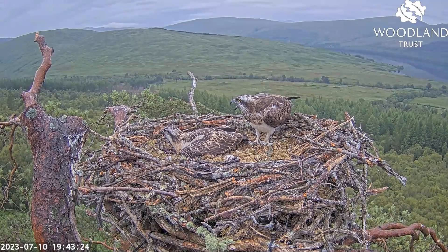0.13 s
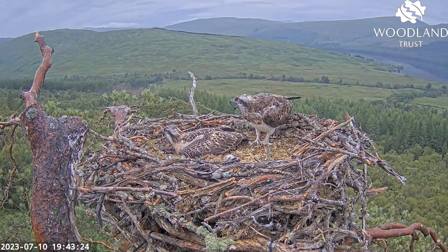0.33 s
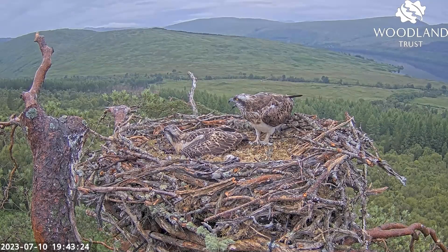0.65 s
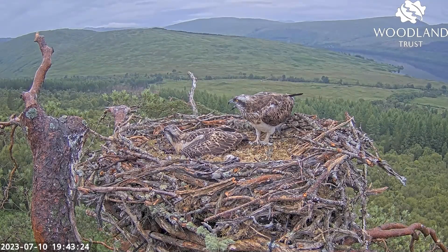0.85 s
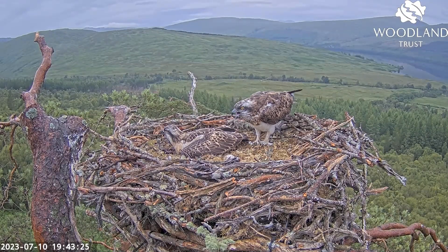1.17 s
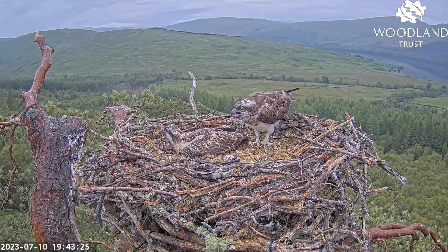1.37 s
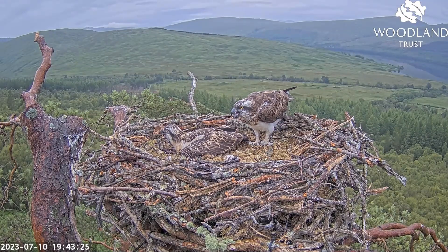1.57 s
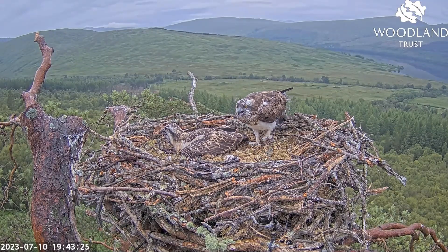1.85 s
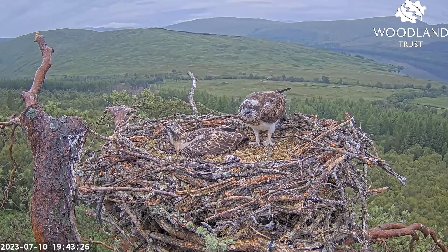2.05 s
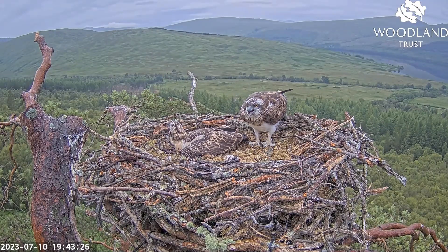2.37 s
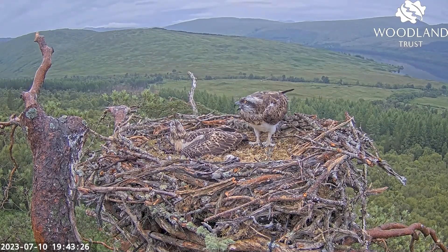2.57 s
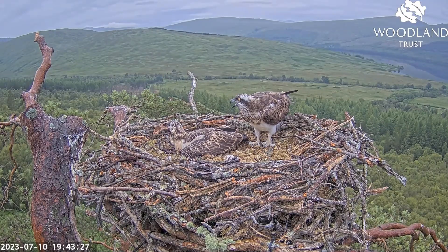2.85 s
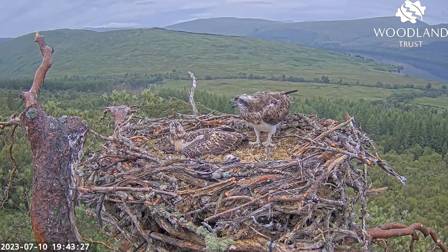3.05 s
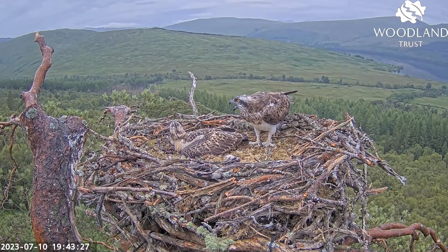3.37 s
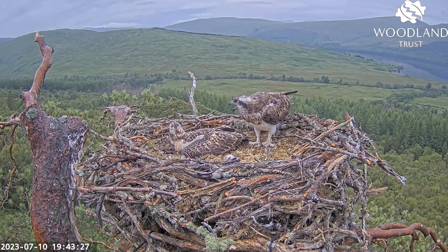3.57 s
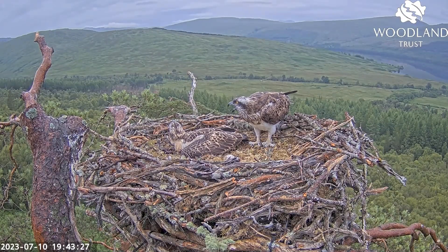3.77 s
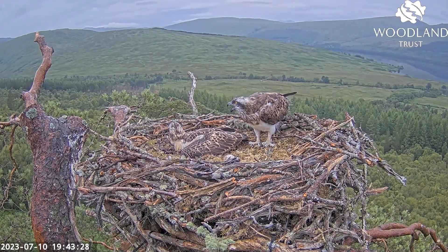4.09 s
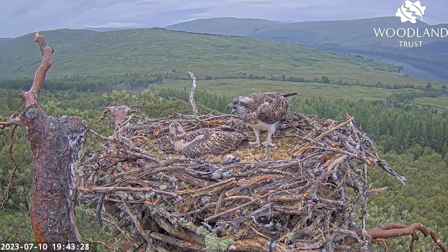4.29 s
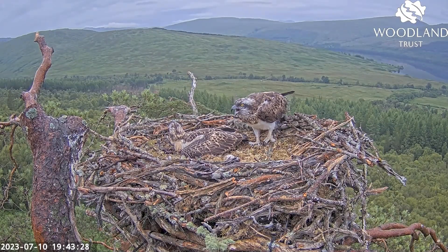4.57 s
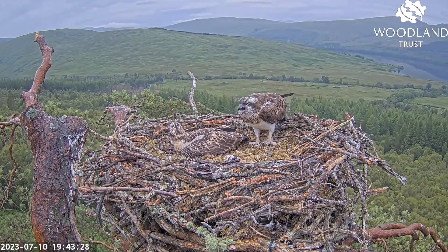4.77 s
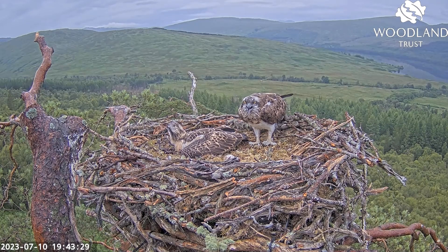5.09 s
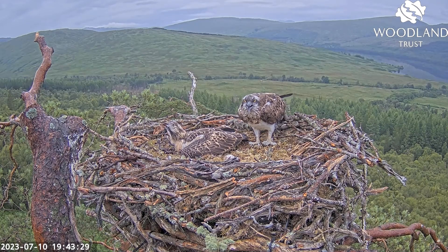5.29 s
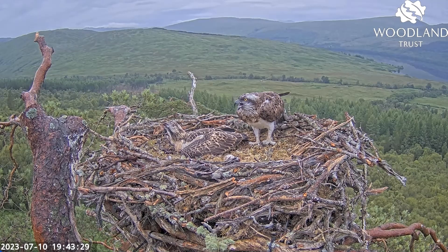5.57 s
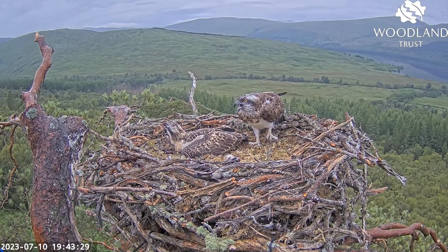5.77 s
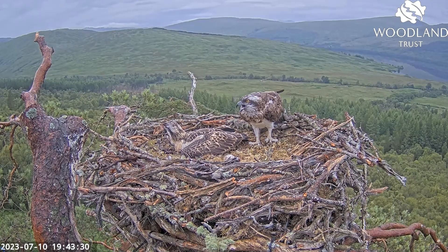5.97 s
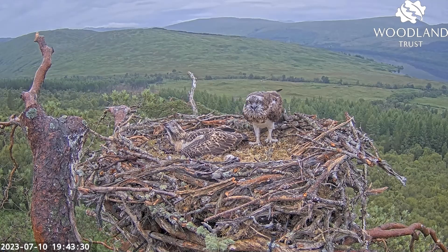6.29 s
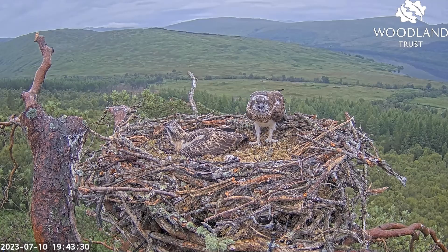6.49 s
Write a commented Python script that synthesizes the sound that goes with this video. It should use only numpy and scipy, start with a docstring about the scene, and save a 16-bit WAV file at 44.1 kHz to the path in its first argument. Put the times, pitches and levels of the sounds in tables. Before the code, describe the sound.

Outdoors at a treetop nest, a large raptor calls close to the microphone from the first moment. Its chirps come evenly, about five per second, each roughly a tenth of a second long with only a tiny gap. A faint hoarse breath leads into a clear rising note near 2.8 to 3 kHz, which cracks up into a thin whistle around 3.6 kHz. From 0 to 1.3 seconds they are fairly clean; from about 1.5 to 2.9 they become higher, brighter and raspier, many ending with a quick falling note. From 3 to 4.3 seconds they are thinner and purer, then from 4.4 they climb again, most strident and harsh around 5 to 5.5, staying rough until the sound cuts off mid-chirp near 6.6. Quiet, steady air and a faint, dull tree echo lie underneath; the top end is slightly dulled.

```python
"""Raptor chirps at a treetop nest

A large raptor gives a fast, even run of hoarse chirps, close by, over quiet air and a faint echo from trees.
Each chirp has a faint hoarse lead-in and a clear rising note made of gliding sines with short-lived overtones.
It breaks upward into a thin whistle and its octave, over a rasp of noise-smeared lines and resonant breath.
Often a falling gliding note closes it. Air is coloured noise; echoes are decaying noise convolved with the bird."""
import sys
import numpy as np
from scipy import signal
from scipy.fft import rfft, irfft
from scipy.io import wavfile

SR = 44100
rng = np.random.default_rng(int(sys.argv[2]) if len(sys.argv) > 2 else 0)


def generate_wav(signal):
    """Clip the signal to [-1, 1] and save it as 16-bit WAV at the path in sys.argv[1]."""
    frames = np.transpose(np.atleast_2d(signal))
    scaled = np.clip(frames, -1, 1) * 32767
    pcm = np.round(scaled).astype(np.int16)
    wavfile.write(sys.argv[1], SR, pcm)


def magnitude_from_level(level_db):
    """Linear magnitude for a level in decibels (20 dB per decade)."""
    exponent = np.asarray(level_db, float) / 20
    return 10 ** exponent


N = 292824


def rms_one(x):
    """Scale to rms 1."""
    return x / np.sqrt(np.mean(np.abs(x) ** 2) + 1e-20)


def drift(rate_hz):
    """Noise through a double one-pole low-pass, rms 1: slow irregular movement."""
    r = np.exp(-2 * np.pi * rate_hz / SR)
    return rms_one(signal.lfilter([1], [1, -2 * r, r * r], rng.standard_normal(N)))


def span(start_s, length_s):
    """Sample indices of a note and the time in seconds since its start."""
    first = max(round(start_s * SR), 0)
    stop = min(round((start_s + length_s) * SR), N)
    index = np.arange(first, stop)
    return index, index / SR - start_s


def fade(t, length_s, attack_s, release_s):
    """Sine-squared rise and fall of a note."""
    ramp = np.minimum(t / attack_s, (length_s - t) / release_s)
    return np.sin(np.pi / 2 * np.clip(ramp, 0, 1)) ** 2


def swelling(t, length_s, mean_db, swell_db):
    """Gain that moves by swell_db through the middle of a note."""
    return magnitude_from_level(mean_db + swell_db * np.interp(t / length_s, [.3, .7], [-.5, .5]))


# Spectrum of the air. Each row: frequency in Hz, relative density in dB per Hz.
AIR_SPECTRUM = [(20, -33), (60, -16.5), (130, -2.5), (450, -4), (750, -3.5), (1050, 4), (1350, 0),
                (2300, 4), (3200, -5.5), (5000, -11), (10000, -19.5)]
AIR_DB = -53.5


def air():
    """Steady outdoor hush: noise shaped in the spectrum, drifting slightly in level."""
    hz, density_db = np.transpose(AIR_SPECTRUM)
    bins_hz = np.maximum(np.arange(N // 2 + 1) * SR / N, 1)
    colour = magnitude_from_level(np.interp(np.log(bins_hz), np.log(hz), density_db))
    hush = irfft(rfft(rng.standard_normal(N)) * colour, N)
    return magnitude_from_level(AIR_DB + 1.1 * drift(1.7)) * rms_one(hush)


NEAR_DB, NEAR_T60_S = 7.5, 0.028
FAR_DB, FAR_T60_S, FAR_CUT_HZ, FAR_ONSET_S = -17, 0.66, 4040, 0.02


def echoes(x):
    """Scattered returns as decaying noise: quick ones from the sticks, a long dull wash from the trees."""
    t = np.arange(SR) / SR
    near = magnitude_from_level(NEAR_DB - 60 * t / NEAR_T60_S) / np.sqrt(NEAR_T60_S * SR)
    near = near * rng.standard_normal(SR)
    far = magnitude_from_level(FAR_DB - 60 * t / FAR_T60_S) / np.sqrt(FAR_T60_S * SR)
    far = far * np.clip(t / FAR_ONSET_S, 0, 1) * rng.standard_normal(SR)
    far = signal.lfilter(*signal.butter(2, FAR_CUT_HZ, fs=SR), far)
    return signal.fftconvolve(x, near + far)[:N]


# Hoarse lead-ins, one before each opening note. Each row: start in seconds, peak level before flutter in dB.
LEAD_INS = [(0.0, -37), (0.172, -42.5), (0.356, -40), (0.556, -41.5), (0.748, -35), (0.938, -40),
            (1.131, -39), (1.324, -32.5), (1.519, -41.5), (1.708, -42), (1.915, -41.5), (2.118, -32),
            (2.32, -35), (2.535, -38), (2.752, -49), (2.965, -63), (3.16, -46), (3.351, -42.5),
            (3.553, -38), (3.754, -43), (3.957, -42.5), (4.155, -37), (4.355, -37.5), (4.552, -28),
            (4.756, -33), (4.964, -28.5), (5.17, -33), (5.373, -42), (5.587, -42.5), (5.804, -38),
            (5.991, -41), (6.205, -30), (6.395, -37), (6.616, -33)]


def lead_in():
    """A faint rise before each chirp, as the air starts to flow: a gliding sine, hoarse from level flutter."""
    out, flutter = np.zeros(N), drift(110)
    for (start, level_db), (stop, _, top_hz, *_) in zip(LEAD_INS, OPENING_NOTES):
        whole = stop + 0.0069 - start
        index, t = span(start, whole)
        hz = top_hz * (.66 + 0.13 * t / whole)
        tone = np.sin(2 * np.pi * np.cumsum(hz) / SR) * (1 + 0.93 * flutter[index])
        out[index] += magnitude_from_level(level_db) * fade(t, whole, 0.0067, 0.015) * tone
    return out


# Throat resonances below the whistle. Each row: centre in Hz, pole width in Hz, relative level in dB.
BREATH_LOW = [(1270, 270, -26.5), (2269, 246, -4), (2600, 550, -5)]
# Throat resonances above the whistle. Each row: centre in Hz, pole width in Hz, relative level in dB.
BREATH_HIGH = [(4400, 280, -10.5), (5370, 470, -12.5), (6080, 490, -7.5), (6800, 470, -9),
               (7880, 120, -15.5), (9010, 370, -15.5), (9300, 200, -20.5)]


def throat(modes):
    """Breath noise through narrow resonances in parallel; each one flutters on its own."""
    out, white = 0, rng.standard_normal(N)
    for hz, width_hz, level_db in modes:
        r = np.exp(-np.pi * width_hz / SR)
        b, a = [1, 0.0019, -0.92], [1, -2 * r * np.cos(2 * np.pi * hz / SR), r * r]
        band = rms_one(signal.lfilter(b, a, signal.lfilter(b, a, white)))
        out = out + magnitude_from_level(level_db + 2.7 * drift(49)) * band
    return out


RASP_RATIO = .6   # lower voice as a share of the whistle pitch
RASP_BLUR_HZ = 85   # corner of the noise that smears each line
RASP_SWELL_DB, OCTAVE_SWELL_DB = -4.5, -0.4   # late level minus early level


def blurred(phase, level_db):
    """A line smeared by irregular vibration, coming and going."""
    line = drift(RASP_BLUR_HZ) * np.cos(phase) + drift(RASP_BLUR_HZ) * np.sin(phase)
    return magnitude_from_level(level_db + 3.46 * drift(25.2)) * line


def rasp():
    """Irregular lower voice, its beats with the whistle, hoarse remains of the opening note, and breath."""
    low_gain, high_gain, tracks_hz = np.zeros(N), np.zeros(N), np.zeros((3, N))
    for opening, whistle in zip(OPENING_NOTES, WHISTLES):
        corners_s, corners_hz = whistle_curve(opening, whistle)
        whole = corners_s[-1] + .018 - opening[0]
        index, t = span(opening[0], whole)
        shape = fade(t, whole, 0.013, 0.036)
        low_gain[index] = shape * swelling(t, whole, whistle[4], RASP_SWELL_DB)
        high_gain[index] = shape * swelling(t, whole, whistle[3], OCTAVE_SWELL_DB)
        whistle_hz = np.interp(index / SR, corners_s, corners_hz)
        tracks_hz[0, index] = whistle_hz
        # the lower voice glides half as far
        tracks_hz[1, index] = RASP_RATIO * (np.mean(corners_hz) + whistle_hz) / 2
        tracks_hz[2, index] = opening[2]
    upper, lower, held = 2 * np.pi * np.cumsum(tracks_hz, axis=1) / SR

    low = blurred(lower, -2.5) + blurred(held, -14.5) + blurred(held * 3 / 2, -18)
    # both voices share one airway, so sum and difference tones appear
    high = blurred(upper + lower, -11) + blurred(2 * upper - lower, -13.5)
    high = high + blurred(2 * held, -16.5) + blurred(held * 5 / 2, -9.5)
    return low_gain * (low + throat(BREATH_LOW)) + high_gain * (high + throat(BREATH_HIGH))


BREAK_S = .0025   # gap between the nominal end of the opening note and the whistle
LOW_SHARE, CREST_SHARE, END_SHARE, CUT_SHARE = .979, 1.021, .964, .987   # shares of the whistle pitch
CLIMB_S, DROP_S = .033, .019
SAG_HZ_PER_S, CEILING_HZ = 1800, 4075


def whistle_curve(opening, whistle):
    """Corner times and pitches: sag, climb to a crest, drop; it drops less where a closing note takes over."""
    start, (end, hz, *_) = opening[0] + opening[1] + BREAK_S, whistle
    low_s = max(end - DROP_S - CLIMB_S, start + 0.0035)
    closed = any(abs(row[0] - end) < .02 for row in CLOSING_NOTES)
    low_hz = LOW_SHARE * hz
    end_hz = (CUT_SHARE if closed else END_SHARE) * hz
    pitch_hz = [low_hz + SAG_HZ_PER_S * (low_s - start), low_hz, CREST_SHARE * hz, end_hz]
    return np.array([start, low_s, end - DROP_S, end]), np.minimum(pitch_hz, CEILING_HZ)


# Whistles, each starting where its opening note breaks. Each row: end in seconds, reference pitch in Hz,
# mean level in dB, octave and upper rasp level in dB, lower rasp level in dB.
WHISTLES = [(0.113, 3570, -33.5, -41.5, -34.5), (0.293, 3597, -35, -42, -38),
            (0.482, 3552, -32, -41, -37.5), (0.665, 3610, -31.5, -40, -35),
            (0.862, 3535, -31.5, -38.5, -35), (1.049, 3585, -33.5, -39.5, -34),
            (1.249, 3634, -29, -35.5, -33.5), (1.447, 3724, -33, -35, -32.5),
            (1.627, 3757, -34.5, -30.5, -29), (1.83, 3802, -35.5, -31, -31.5), (2.032, 3780, -29, -30, -29),
            (2.236, 3796, -29.5, -31, -31), (2.427, 3760, -29, -29.5, -32.5),
            (2.66, 3683, -34.5, -35, -31.5), (2.871, 3573, -32.5, -35.5, -32),
            (3.092, 3516, -32, -43, -39.5), (3.281, 3510, -34.5, -39, -37.5),
            (3.48, 3535, -35, -40.5, -37.5), (3.673, 3540, -37, -41.5, -36),
            (3.886, 3512, -35.5, -41, -37.5), (4.085, 3556, -37, -42, -36.5),
            (4.287, 3598, -35, -40.5, -35.5), (4.474, 3681, -33.5, -33, -32.5),
            (4.681, 3910, -33, -31, -30.5), (4.877, 3898, -32.5, -30.5, -31.5),
            (5.078, 4030, -35.5, -29.5, -32), (5.278, 4054, -34, -27.5, -27.5),
            (5.512, 3898, -33, -30, -28.5), (5.72, 3805, -32, -32.5, -29.5),
            (5.924, 3858, -33.5, -31.5, -27.5), (6.124, 3790, -33.5, -35.5, -30.5),
            (6.332, 3792, -29, -31, -29), (6.528, 4020, -31, -31, -31)]
WHISTLE_SWELL_DB = -3.3   # late level minus early level


def whistles():
    """The upper register: a thin line and its octave, wobbling in pitch and level."""
    out, wobble = np.zeros(N), 1 + .0025 * drift(70)
    line_shake, octave_shake = magnitude_from_level(3.2 * drift(90)), magnitude_from_level(2.2 * drift(70))
    for opening, whistle in zip(OPENING_NOTES, WHISTLES):
        corners_s, corners_hz = whistle_curve(opening, whistle)
        whole = corners_s[-1] - corners_s[0] + 0.022
        index, t = span(corners_s[0] - .006, whole)
        hz = np.interp(index / SR, corners_s, corners_hz) * wobble[index]
        phase = 2 * np.pi * np.cumsum(hz) / SR
        line = swelling(t, whole, whistle[2], WHISTLE_SWELL_DB) * line_shake[index] * np.sin(phase)
        octave = swelling(t, whole, whistle[3], OCTAVE_SWELL_DB) * octave_shake[index] * np.sin(2 * phase)
        out[index] += np.sqrt(2) * fade(t, whole, 0.0096, 0.026) * (line + octave)
    return out


def glide(row, attack_s, release_s, bend, swell_s, partials):
    """One clear gliding note: overtones enter after brief delays and decay while the fundamental swells in."""
    start, length, from_hz, to_hz, level_db, octave_db = row
    whole = length + attack_s / 2 + release_s / 2
    index, t = span(start - attack_s / 2, whole)
    hz = from_hz + (to_hz - from_hz) * np.maximum(t / length, 0) ** bend
    phase = 2 * np.pi * np.cumsum(hz) / SR
    tone = magnitude_from_level(level_db) * (1 - np.exp(-t / swell_s)) * np.sin(phase)
    for multiple, relative_db, delay_s, t60_s in partials:
        envelope = np.clip(t / delay_s - 1, 0, 1) * magnitude_from_level(-60 * t / t60_s)
        tone += magnitude_from_level(octave_db + relative_db) * envelope * np.sin(multiple * phase)
    return index, np.sqrt(2) * tone * fade(t, whole, attack_s, release_s)


# Opening notes, one per chirp. Each row: start in seconds, nominal length in seconds,
# pitch reached after that length in Hz, fundamental level in dB, reference level of the partials in dB.
OPENING_NOTES = [(0.019, .02, 2830, -23.5, -31), (0.2, 0.02, 2820, -23, -32),
                 (0.385, .022, 2820, -26, -32.5), (0.576, 0.017, 2787, -24, -31.5),
                 (0.769, 0.014, 2801, -25, -30), (0.955, 0.018, 2850, -25.5, -30),
                 (1.148, 0.019, 2873, -22.5, -28), (1.342, .017, 2940, -21, -29),
                 (1.542, .02, 2955, -19.5, -27), (1.74, 0.024, 2987, -22, -28),
                 (1.94, .031, 3003, -25.5, -26.5), (2.138, 0.033, 3027, -27, -24.5),
                 (2.337, 0.023, 2980, -25, -21.5), (2.555, .028, 2960, -26.5, -24.5),
                 (2.775, 0.025, 2860, -23.5, -31), (2.984, 0.028, 2805, -26.5, -37),
                 (3.178, 0.016, 2746, -24, -33), (3.373, 0.019, 2796, -24, -31.5),
                 (3.574, 0.014, 2792, -23, -33.5), (3.775, .02, 2862, -25.5, -34.5),
                 (3.972, 0.018, 2835, -27.5, -33), (4.173, .019, 2840, -25.5, -30.5),
                 (4.373, 0.02, 2876, -20, -26.5), (4.569, .02, 2985, -20.5, -24.5),
                 (4.771, .03, 3034, -22.5, -21), (4.979, .031, 3146, -26, -19),
                 (5.186, .034, 3072, -30.5, -22), (5.409, .035, 2997, -24.5, -23),
                 (5.62, 0.035, 2985, -29, -31.5), (5.823, 0.022, 2913, -24.5, -27.5),
                 (6.019, .026, 2935, -24.5, -26.5), (6.22, .037, 2976, -26, -26),
                 (6.425, .03, 3164, -32, -22), (6.632, 0.0095, 3030, -27, -20.5)]
# Closing notes, where the voice falls back. Each row: start in seconds, pitch reached after CLOSING_S in Hz,
# fundamental level in dB, reference level of the partials in dB.
CLOSING_NOTES = [(1.632, 2690, -24.5, -22.5), (1.833, 2722, -26.5, -19.5), (2.036, 2700, -32, -26),
                 (2.232, 2713, -28.5, -18), (2.429, 2654, -30, -20.5), (2.658, 2600, -28, -29.5),
                 (2.865, 2600, -23, -22.5), (3.094, 2419, -40.5, -64), (4.479, 2590, -34.5, -38),
                 (4.683, 2686, -30.5, -28), (4.88, 2663, -28.5, -23), (5.072, 2780, -32, -17.5),
                 (5.276, 2840, -30.5, -16), (5.509, 2781, -29.5, -15), (5.722, 2706, -28.5, -22.5),
                 (5.923, 2730, -28.5, -24), (6.331, 2640, -33, -26), (6.534, 2834, -38, -25)]
# Partials of the opening note. Each row: multiple of the pitch, level re the partials' reference in dB,
# entry delay in seconds, T60 in seconds.
OPENING_OVERTONES = [(1.997, 1.5, 0.0018, 3.3), (2.957, -2, 0.00044, 0.082), (.5, -22.5, 0.0031, 0.9),
                     (0.45, -31.5, 0.0056, 0.33), (2.408, -4.5, 0.0049, 0.16)]
# Partials of the closing note. Each row: multiple of the pitch, level re the partials' reference in dB,
# entry delay in seconds, T60 in seconds.
CLOSING_OVERTONES = [(2, 5.5, 0.00068, 0.054), (3, -11, 0.0019, 0.11)]
OPENING_FROM, CLOSING_FROM = .918, 1.095   # start pitch as a share of the pitch reached
CLOSING_S = 0.018
CRACK_S, CRACK_T60_S = .008, 0.0056


def clear_notes():
    """Opening notes with a short noise crack as the voice catches, and closing notes; all flutter in level."""
    out, bright_noise = np.zeros(N), np.diff(rng.standard_normal(N + 1))
    for start, length, top_hz, level_db, octave_db in OPENING_NOTES:
        row = start, length, OPENING_FROM * top_hz, top_hz, level_db, octave_db
        index, tone = glide(row, attack_s=0.0028, release_s=0.025, bend=0.773, swell_s=0.0034,
                            partials=OPENING_OVERTONES)
        out[index] += tone
        index, t = span(start, CRACK_S)
        out[index] += magnitude_from_level(octave_db - 4.5 - 60 * t / CRACK_T60_S) * bright_noise[index]
    for start, end_hz, level_db, octave_db in CLOSING_NOTES:
        row = start, CLOSING_S, CLOSING_FROM * end_hz, end_hz, level_db, octave_db
        index, tone = glide(row, attack_s=0.015, release_s=0.017, bend=0.89, swell_s=0.0013,
                            partials=CLOSING_OVERTONES)
        out[index] += tone
    return out * magnitude_from_level(2.2 * drift(110))


def scene():
    """Bird, its echoes and the air."""
    bird = clear_notes() + whistles() + rasp() + lead_in()
    return (bird + echoes(bird) + air())[None]


# Dips in the microphone response. Each row: centre in Hz, width in Hz, depth in dB.
RESPONSE_DIPS = [(1740, 520, -12), (3330, 240, -9), (4880, 340, -13), (6270, 300, -14), (6640, 130, -10),
                 (8500, 800, -14)]


def housing(x):
    """Reflections in the housing cut narrow dips: one peaking filter each, with negative gain."""
    for hz, width_hz, depth_db in RESPONSE_DIPS:
        w = 2 * np.pi * hz / SR
        q = np.sin(w) * width_hz / hz / 2
        cut = q * magnitude_from_level(depth_db)
        x = signal.lfilter([1 + cut, -2 * np.cos(w), 1 - cut], [1 + q, -2 * np.cos(w), 1 - q], x)
    return x


def top_cut(x):
    """Nothing passes above the cut-off."""
    return signal.sosfilt(signal.butter(12, 10560, fs=SR, output="sos"), x)


def record(dry):
    """Housing dips, then a narrow-band channel with a steep low-pass."""
    low_pass = signal.butter(18, 9060, fs=SR, output="sos")
    narrow = signal.sosfilt(low_pass, housing(dry))
    return top_cut(narrow)


dry = scene()
out = record(dry)
generate_wav(out)
```